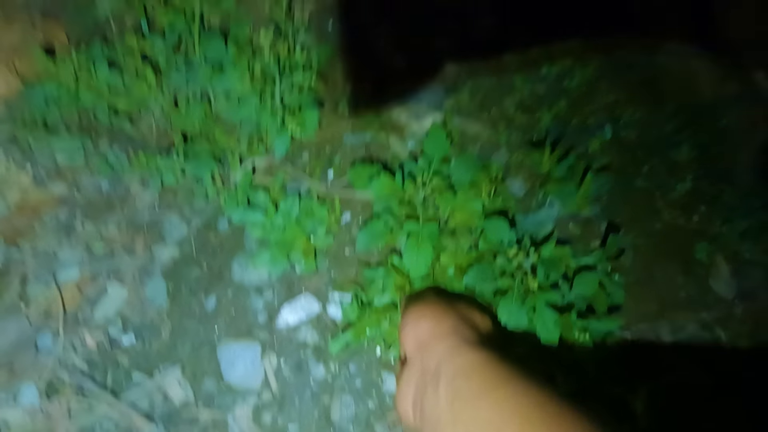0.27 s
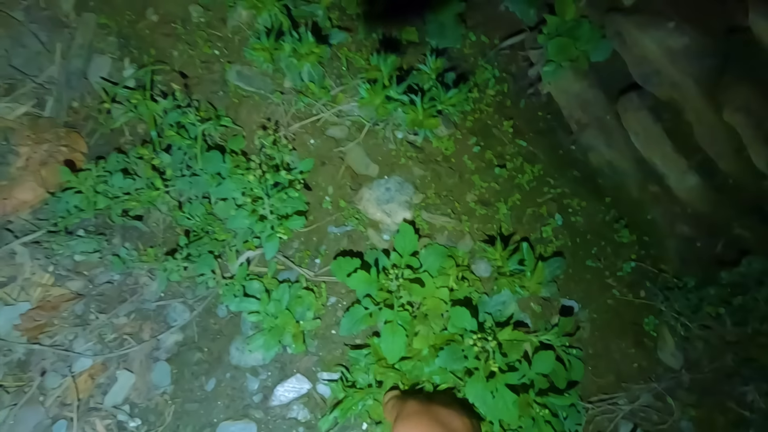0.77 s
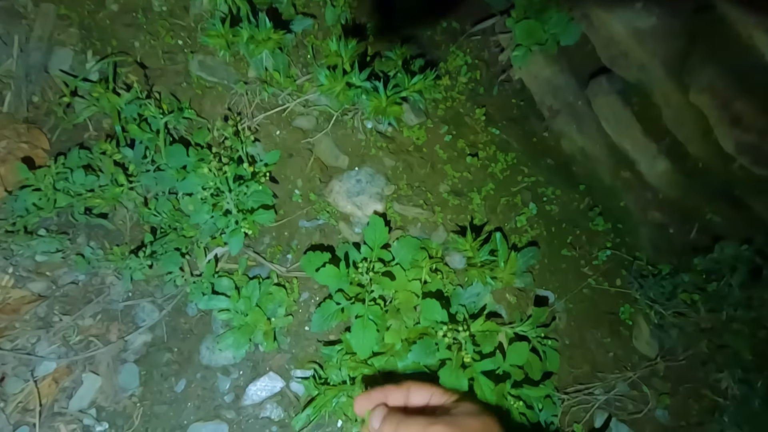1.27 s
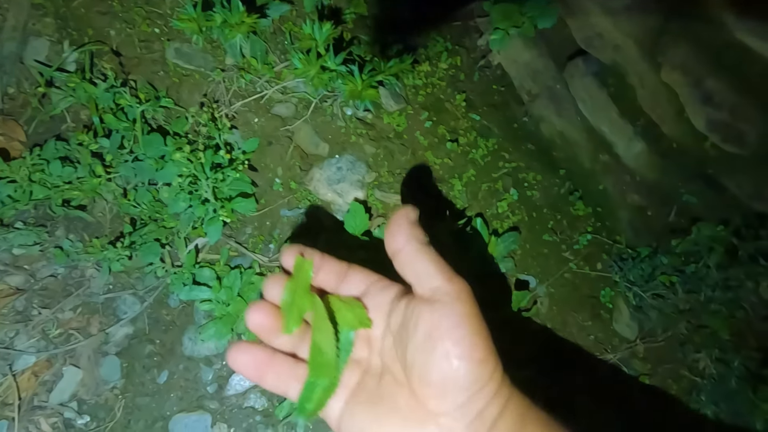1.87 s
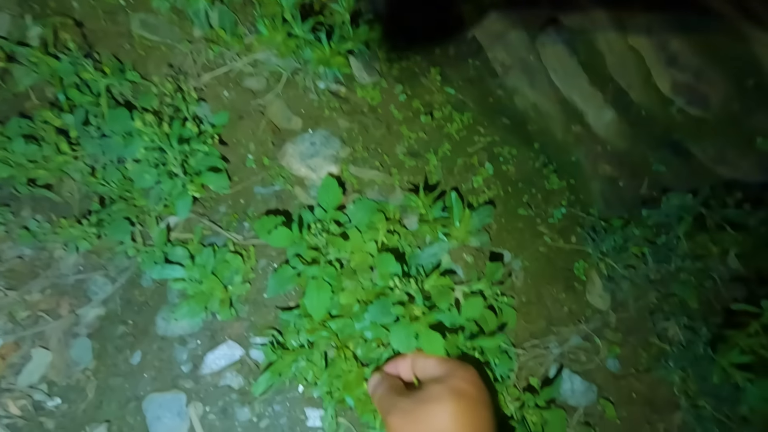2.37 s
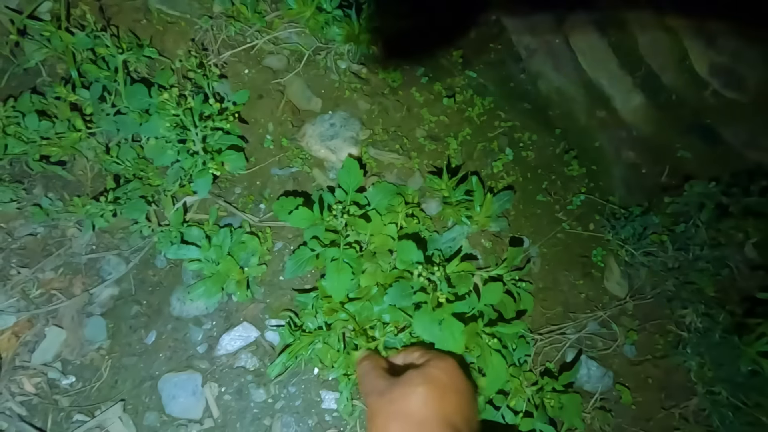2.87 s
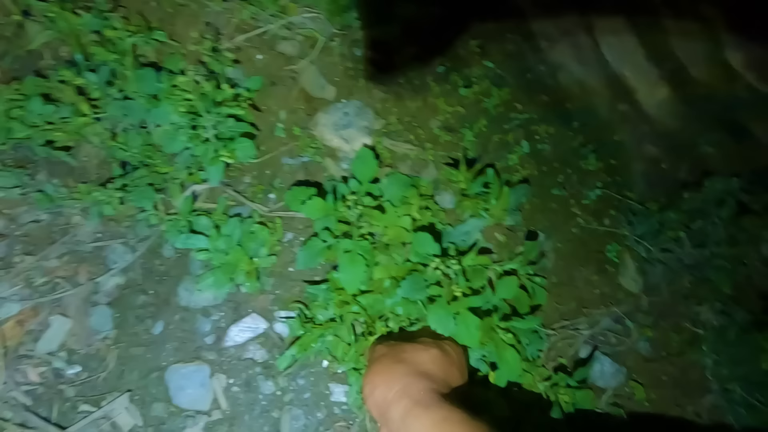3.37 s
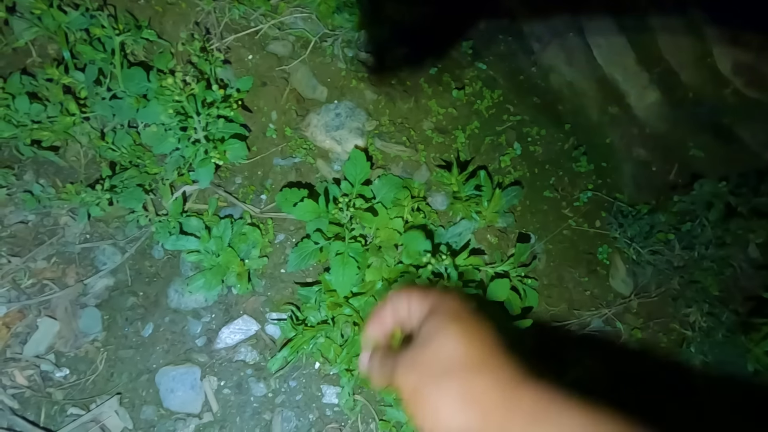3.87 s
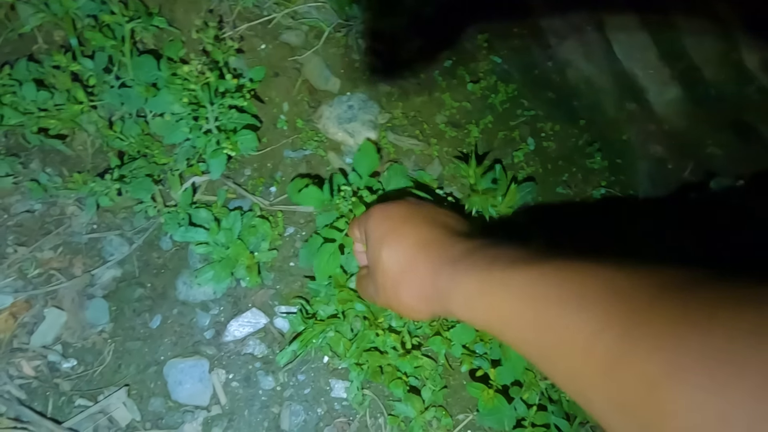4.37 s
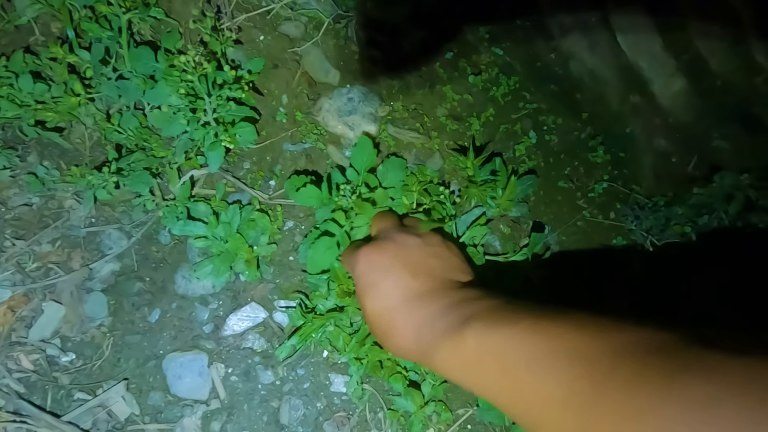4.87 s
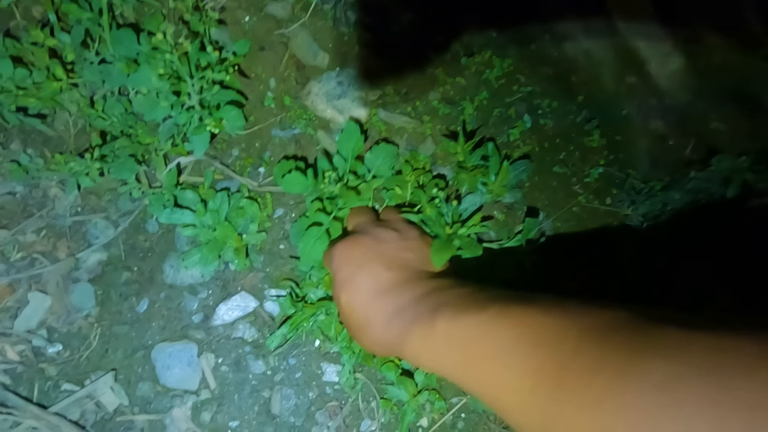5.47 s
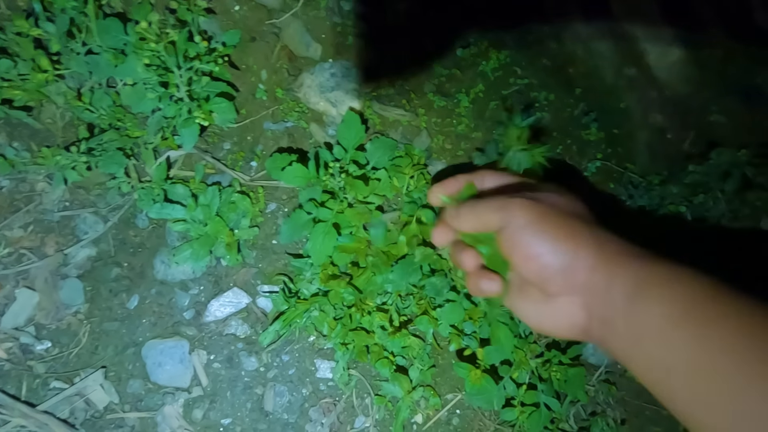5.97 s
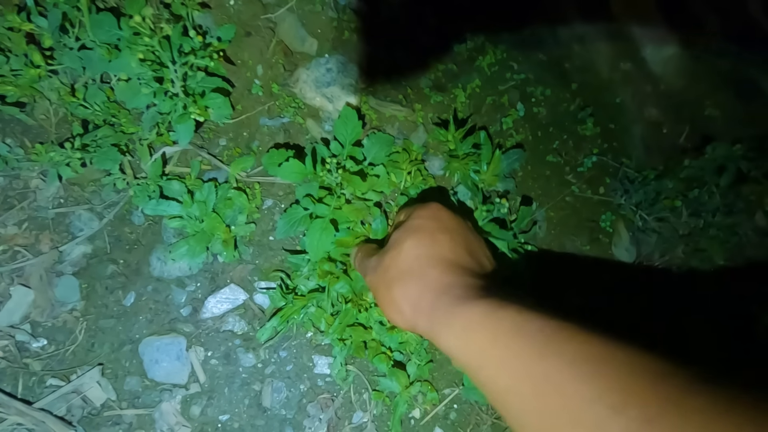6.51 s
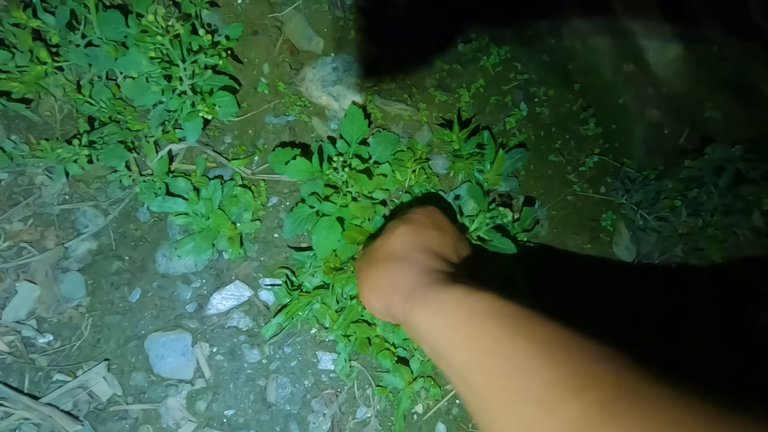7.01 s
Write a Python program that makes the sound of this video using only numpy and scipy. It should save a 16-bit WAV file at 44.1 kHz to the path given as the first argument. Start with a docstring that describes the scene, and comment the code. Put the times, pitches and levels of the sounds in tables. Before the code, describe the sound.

A dense chorus of field crickets chirps steadily at night while a hand rustles through leaves close by, with sharp little stem snaps and ticks.

```python
"""A night garden full of field crickets, with foliage rustling close by.
The crickets, a few near and many far, are falling 5 kHz sine syllables with faint octaves and echoes.
A hand picks leaves: shaped noise grains rustle, a thin noise band squeaks, and sharp clicks tick and snap.
The camera is bumped softly, as low taps and sways, and puffs of air rumble on its microphone."""
import sys
import numpy as np
from scipy import signal
from scipy.fft import rfft, irfft, next_fast_len
from scipy.io import wavfile
from scipy.ndimage import uniform_filter1d, map_coordinates

SR = 44100
rng = np.random.default_rng(int(sys.argv[2]) if len(sys.argv) > 2 else 0)


def store_wav(level_fs):
    """Save 16-bit WAV to argv[1]."""
    pcm = np.round(np.clip(np.atleast_2d(level_fs), -1, 1) * 32767)
    wavfile.write(sys.argv[1], SR, pcm.T.astype(np.int16))


N = 319725


def amp(db):
    """Decibels to gain."""
    return 10 ** (np.asarray(db) / 20)


def unit(x):
    """Scale to rms 1."""
    return x / np.sqrt(np.mean(x ** 2) + 1e-20)


def along(points, hz):
    """Read (f/Hz, level/dB) points on a log frequency axis, falling steeply beyond the ends."""
    f, level = np.transpose(points)
    knots = np.log([f[0] / 2, *f, f[-1] * 1.1])
    return np.interp(np.log(hz + 1), knots, [level[0] - 40, *level, level[-1] - 40])


def curves(rows):
    """One value per sample for each column after the time."""
    times, *columns = np.transpose(rows)
    return [np.interp(np.arange(N) / SR, times, column) for column in columns]


def wobble(rate):
    """A smooth random curve with rate knots a second."""
    knots = rng.standard_normal(int(N * rate / SR) + 4)
    return map_coordinates(knots, [np.arange(N) * rate / SR])


def colour(x, points):
    """Give x a spectrum."""
    size = next_fast_len(N + SR // 2)
    gain = amp(along(points, np.fft.rfftfreq(size, 1 / SR)))
    return irfft(rfft(x, size) * gain, size)[..., :N]


def impulse(points, size=1024):
    """The causal click that has this spectrum, peak 1."""
    gain = amp(along(points, np.fft.rfftfreq(size, 1 / SR)))
    # folding the cepstrum forward in time gives minimum phase: the energy comes at once
    cepstrum = irfft(np.log(gain))
    cepstrum[1:size // 2] *= 2
    cepstrum[size // 2 + 1:] = 0
    click = irfft(np.exp(rfft(cepstrum)))
    return click / np.abs(click).max()


def pan(db):
    """Left and right gains for a level difference; positive leans left."""
    return amp([[db / 2], [-db / 2]])


def spread(pair, side_db):
    """Two unrelated signals as the middle and the side of a stereo image."""
    mid, side = pair[0], amp(side_db) * pair[1]
    return np.array([mid + side, mid - side])


def add(track, s, sound):
    """Mix a sound into the track at time s."""
    start = round(s * SR)
    a, b = max(start, 0), min(start + sound.shape[-1], N)
    if b > a:
        track[..., a:b] += sound[..., a - start:b - start]


def scatter(x, t60, side_db):
    """Stereo echoes from stones, ground and plants: a decaying noise tail."""
    t = np.arange(SR // 3) / SR
    tail = spread(rng.standard_normal((2, len(t))), side_db) * amp(-60 * t / t60)
    tail /= np.linalg.norm(tail.mean(0))
    return signal.fftconvolve(x[None], tail, axes=1)[:, :N]


def patchy(x, depth_db):
    """Let the sound favour different frequencies from moment to moment, as each touched leaf does."""
    z = signal.stft(x, nperseg=256)[2]
    field = rng.standard_normal(z.shape[1:])
    field = uniform_filter1d(field, size=5, axis=0)  # across frequency
    field = uniform_filter1d(field, size=12, axis=1)  # across time
    return signal.istft(z * amp(depth_db * unit(field)), nperseg=256)[1][:, :N]


# spectrum shape of still air and distant insects: [f/Hz, relative level/dB]
NIGHT_SPECTRUM = [(25, 6.5), (55, -3.5), (100, -7.5), (170, 2.5), (330, -5.5), (600, -11.5), (1300, -15.5),
                  (2300, -28), (3500, -20), (6800, -8), (8300, -15.5), (10300, -12), (11500, -40),
                  (15000, -28)]


def night():
    """The quiet floor of the open air: wide noise with gently shifting patches."""
    noise = spread(rng.standard_normal((2, N)), side_db=-3.5)
    return amp(-69.0) * unit(colour(patchy(noise, depth_db=1.5), NIGHT_SPECTRUM))


# one wing stroke, slowing as it closes: [t/s from its loudest moment, pitch ratio, relative level/dB]
WING_STROKE = [(-.012, 1.045, -28), (-.005, 1.022, -6), (0, 1, 0), (.005, .968, -7), (.011, .925, -13),
               (.019, .875, -16), (.025, .85, -34)]


def add_syllable(track, s, db, hz, overtone_db=-35, uneven_db=2):
    """The scraper runs down the wing's file with uneven pressure: a falling tone with a faint octave."""
    when, ratio, level = np.transpose(WING_STROKE)
    below_peak = level < level.max()
    level = level + uneven_db * rng.standard_normal(len(level)) * below_peak
    t = np.arange(when[0], when[-1], 1 / SR)
    steepness = rng.uniform(0.86, 1.234)  # of the pitch fall
    pitch = hz * np.interp(t, when, ratio) ** steepness
    phase = 2 * np.pi * (np.cumsum(pitch) / SR + rng.random())
    tone = np.sin(phase) + amp(overtone_db) * np.sin(2 * phase)
    add(track, s + when[0], amp(db + np.interp(t, when, level)) * tone)


# spectrum shape of the merged farthest crickets: [f/Hz, relative level/dB per Hz]
HAZE_SPECTRUM = [(2000, -78), (3400, -54), (3460, -40), (4000, -15), (4090, -12.5), (4280, -9.5),
                 (4500, -0.5), (4940, -6), (5250, -23.5), (5490, -8.5), (5890, -27), (6300, -34),
                 (8190, -79), (13900, -120)]
# the far crickets together, before the chorus and haze trims: [t/s, level/dB]
FAR_CRICKET_LEVEL = [(0.0, -49.5), (0.8, -48.5), (1.15, -50), (1.32, -47.5), (1.97, -50.5), (2.75, -48.5),
                     (3.9, -49), (4.45, -51), (4.85, -49), (5.42, -50), (6.1, -49), (7.1, -51)]


def far_crickets(count=9, pitch_hz=5020, stroke_gap=.051, chirp_gap=.29):
    """Each cricket repeats four-syllable chirps at its own pitch and pace, from its own place."""
    chorus = np.zeros((2, N))
    for rank in np.linspace(-1, 1, count):
        song = np.zeros(N)
        hz = pitch_hz * (1 + 0.0544 * rank)
        pace = chirp_gap * rng.uniform(.85, 1.25)
        for start in np.arange(-rng.random() * pace, N / SR, pace):
            start += rng.normal(0, .015)
            for k in range(4):
                db = rng.normal(0, 2.5) - 3 * abs(rank)
                add_syllable(song, start + k * stroke_gap, db, hz * (1 + rng.normal(0, 0.0075)))
        # a sound from one side reaches one microphone a moment later
        direct = np.array([song, np.roll(song, rng.integers(-1, 2))])
        chorus += direct + amp(-3.0) * scatter(song, t60=0.22, side_db=-3.5)
    # the farthest ones merge into a narrow hiss
    haze = unit(colour(spread(rng.standard_normal((2, N)), side_db=-4.5), HAZE_SPECTRUM))
    haze_db = -4 + 1.44 * wobble(11)
    level_db, = curves(FAR_CRICKET_LEVEL)
    return amp(level_db) * (amp(-2.5) * unit(chorus) + amp(haze_db) * haze) * pan(2.7)


def chirping(rows, gap_s, soft_db, flat, count=4):
    """Chirps of a few wing strokes that start soft and flat, and reach full level and pitch at the end."""
    song = np.zeros(N)
    for s, db, hz in rows:
        for k in range(count):  # counted back from the last stroke
            slack = (k / (count - 1)) ** 2
            stroke_db = db - soft_db * slack + rng.normal(0, 0.46)
            add_syllable(song, s - k * gap_s, stroke_db, hz * (1 - flat * slack))
    return song


# the neighbours' free chirps, before pan and echo: [t/s of the last stroke, level/dB, f/Hz]
NEIGHBOUR_CHIRPS = [(0.282, -39, 5040), (0.715, -41, 5070), (0.89, -43, 5230), (1.095, -37, 5025),
                    (1.374, -39.5, 5170), (1.825, -35.5, 5150), (1.946, -36.5, 4986), (2.295, -39, 4980),
                    (2.776, -36, 5065), (3.243, -40.5, 5120), (3.747, -39, 5175), (4.027, -38.5, 5060),
                    (4.192, -37.5, 4995), (4.434, -41, 5060), (4.625, -39, 5130), (4.856, -40.5, 5080),
                    (5.077, -37, 5140), (5.302, -38, 5080), (5.566, -35.5, 5180), (6.049, -41.5, 5120),
                    (6.514, -40.5, 5240), (6.91, -37.5, 4900), (6.974, -37.5, 5190)]


def neighbours():
    """A little farther off than the nearest, crickets with faster strokes and more echo."""
    song = chirping(NEIGHBOUR_CHIRPS, gap_s=0.035, soft_db=15, flat=0.0194)
    return song * pan(2.3) + amp(-5) * scatter(song, t60=0.078, side_db=-4.5)


# runs of evenly timed chirps, by their last strokes: [first chirp t/s, last chirp t/s]
LEAD_CHIRP_RUNS = [(0.2, 0.522), (0.793, 3.977), (4.45, 4.716), (5.361, 7.229)]
# the nearest cricket's loudness, before pan and echo: [t/s, level/dB]
LEAD_CRICKET_LEVEL = [(0.4, -37), (1.05, -34), (2.0, -36.5), (2.8, -38), (3.7, -35), (3.97, -39),
                      (4.45, -53), (5.35, -37), (6.2, -40.5), (7.2, -38)]


def lead_cricket(pitch_hz=5025, period_s=.265):
    """The nearest cricket chirps on the left, evenly within each run, with a short echo."""
    runs = []
    for first, last in LEAD_CHIRP_RUNS:
        # a whole number of chirps fills the run, so the period is approximate
        runs.append(np.linspace(first, last, round((last - first) / period_s) + 1))
    times = np.concatenate(runs)
    levels = np.interp(times, *np.transpose(LEAD_CRICKET_LEVEL))
    rows = [(s, db, pitch_hz) for s, db in zip(times, levels)]
    song = chirping(rows, gap_s=.0485, soft_db=11.5, flat=0.0571)
    return song * pan(7.6) + amp(-6.5) * scatter(song, t60=0.16, side_db=-9)


# soft bumps on the camera, before pan: [t/s, tap level/dB, sway level/dB]
CAMERA_BUMPS = [(0.571, -44.5, -43), (1.094, -54, -71), (1.279, -54.5, -85)]
# bell-shaped swells of air on the microphone, before pan: [t/s of the middle, sigma/s, level/dB]
AIR_PUFFS = [(0.62, 0.031, -54), (.98, 0.03, -72), (1.918, 0.048, -52.5), (3.172, 0.091, -72),
             (7.14, .025, -60.5)]


def handling(sway_hz=62, sway_t60=0.31):
    """Bumps tap and sway the camera; puffs of air rumble on its microphone."""
    bumps, t = np.zeros(N), np.arange(SR // 4) / SR
    tap = impulse([(60, -29), (180, 5), (360, 14), (600, -15), (1500, -13)])
    # the grip yields, so the sway slows from sway_hz as it dies
    sway = amp(-60 * t / sway_t60) * np.sin(2 * np.pi * sway_hz * t / (1 + 5 * t))
    for s, tap_db, sway_db in CAMERA_BUMPS:
        add(bumps, s, amp(tap_db) * tap)
        add(bumps, s, amp(sway_db) * sway)
    air = np.zeros(N)
    for s, width, db in AIR_PUFFS:
        air += amp(db) * np.exp(-.5 * ((np.arange(N) / SR - s) / width) ** 2)
    noise = spread(rng.standard_normal((2, N)), side_db=-9.0)
    rumble = unit(colour(noise, [(20, 15.0), (40, 3.0), (90, -7.5), (200, -21.5)]))
    return (bumps + air * rumble) * pan(6.0)


def squeak(pitch_hz=1330, db=-68, start_s=1.42, length_s=.11):
    """A leaf squeaks faintly as it slides over the skin: a thin noise band that swells and fades."""
    band = [(pitch_hz * .9, -25), (pitch_hz * .98, 0), (pitch_hz * 1.02, 0), (pitch_hz * 1.1, -25)]
    tone = unit(colour(rng.standard_normal(N), band))
    progress = np.clip((np.arange(N) / SR - start_s) / length_s, 0, 1)
    return amp(db) * np.sin(np.pi * progress) * tone


def grains(rate, size_db):
    """Two trains of tiny slips, rate a second, mostly small and a few large."""
    hits = rng.random((2, N)) < rate / SR
    strength = hits * rng.standard_normal((2, N))
    return unit(strength * amp(size_db * np.minimum(rng.exponential(size=(2, N)), 4)))


# spectrum shape of crisp leaf edges: [f/Hz, relative level/dB per Hz]
EDGE_SPECTRUM = [(2000, -19), (3500, -8), (5000, -8), (6000, -5.5), (7200, 1.5), (7800, -5.5),
                 (8500, -14.5), (10200, -15.5), (11500, -25), (14500, -28.5)]
# spectrum shape of leaf faces rubbing: [f/Hz, relative level/dB per Hz]
FACE_SPECTRUM = [(150, -52), (330, 4.5), (700, -18), (1100, 1), (1450, 4.5), (1900, 1), (2600, 3),
                 (3600, -3), (5000, -1), (8000, -39)]
# the hand stirring in the plants, before unevenness and trims: [t/s, edges level/dB, faces level/dB]
HAND_STIR = [(0.0, -61.5, -74), (0.55, -69, -71.5), (1.05, -65.5, -73.5), (1.23, -65.5, -63.5),
             (1.58, -63, -71.5), (1.7, -76, -79), (2.05, -89, -78.5), (2.2, -60.5, -72), (2.6, -68, -73.5),
             (3.13, -62.5, -68), (3.5, -68.5, -80), (4.05, -67, -72.5), (4.2, -58, -58.5),
             (4.65, -61.5, -65.5), (5.3, -57.5, -63.5), (5.58, -59.5, -70.5), (6.1, -60, -65),
             (7.1, -63, -71)]
# a leaf dragged through the fingers or springing back, before trims:
# [start t/s, length/s before the release, edges level/dB, faces level/dB]
LEAF_BRUSHES = [(0.011, 0.088, -60.5, -78), (0.797, 0.071, -59.5, -67), (1.527, 0.082, -59, -83),
                (2.131, 0.028, -55.5, -83), (2.28, .06, -62, -72), (2.675, 0.046, -63, -71.5),
                (2.838, 0.053, -58.5, -61), (3.772, .07, -55, -58), (3.929, 0.024, -59, -76),
                (4.13, 0.15, -55.5, -64), (4.335, 0.049, -55, -60.5), (4.53, 0.19, -58, -64.5),
                (5.421, 0.023, -63, -72), (5.68, 0.16, -57.5, -58.5), (5.847, 0.092, -52.5, -56.5),
                (6.13, 0.031, -81, -57.5), (6.298, 0.042, -53, -69), (6.443, 0.092, -58.5, -60.5),
                (6.854, 0.052, -57.5, -73), (7.197, .05, -60, -68)]
BRUSH_ATTACK_S, BRUSH_RELEASE_S = 0.015, 0.029


def leaves(flick_db=-6.0):
    """Leaf edges crackle in clumps, with stray flicks, while their faces rub with a softer hush."""
    uneven_db = 2.23 * wobble(14) - 1.3  # fingers catch and let go
    # stirring and brushes add as powers
    edges, faces = amp(np.array(curves(HAND_STIR)) + uneven_db) ** 2
    t = np.arange(N) / SR
    for s, length, edges_db, faces_db in LEAF_BRUSHES:
        attack = np.clip((t - s) / BRUSH_ATTACK_S, 0, 1)
        swell = attack * np.exp(-np.maximum(t - s - length, 0) / BRUSH_RELEASE_S)
        edges += (amp(edges_db) * swell) ** 2
        faces += (amp(faces_db) * swell) ** 2
    clumps = amp(1.26 * wobble(90) + 1.38 * wobble(25))
    crackle = spread(grains(rate=4000, size_db=1.0), side_db=-29) * clumps
    crisp = unit(colour(patchy(crackle, depth_db=2.5), EDGE_SPECTRUM))
    stray = spread(grains(rate=45, size_db=2.5), side_db=-22)
    flicks = unit(colour(patchy(stray, depth_db=3), EDGE_SPECTRUM))
    hush = spread(grains(rate=4000, size_db=1.6), side_db=-3) * clumps
    rub = unit(colour(patchy(hush, depth_db=2.0), FACE_SPECTRUM))
    edge_sound = np.sqrt(edges) * (amp(-0.5) * crisp + amp(flick_db) * flicks)
    return edge_sound * pan(0.45) + np.sqrt(faces) * rub * pan(0.28)


def crack(click, t60, fibres):
    """One sharp break and a spray of tearing fibres, each sounding the same click; peak 1."""
    t = np.arange(SR // 50) / SR
    force = fibres * rng.standard_normal(len(t)) * amp(-60 * t / t60)
    force[0] = 1
    sound = signal.fftconvolve(force, click)
    return sound / np.abs(sound).max()


# a green stalk's broad resonance: [multiple of its pitch, relative level/dB]
STALK_RESONANCE = [(.3, -23.5), (.65, -5.5), (1, 3.5), (1.3, -3.5), (1.8, -24.5), (3, -60)]


def stalk(hz):
    """The heavily damped pop of a green stalk."""
    return impulse([(hz * ratio, db) for ratio, db in STALK_RESONANCE])


# ringing modes of the jolt in the hand, before small random shifts: [f/Hz, relative level/dB, t60/s]
KNOCK_MODES = [(266, -9, 0.085), (348, -4, 0.029), (445, -11, 0.057), (666, 1, .026), (855, 1.5, 0.015),
               (1042, -7.5, 0.026)]


def knock():
    """The short hollow ring of a jolt in the hand: a few decaying sines."""
    t = np.arange(SR // 10) / SR
    ring = np.zeros(len(t))
    for hz, db, t60 in KNOCK_MODES:
        strength_db, detune = rng.normal(0, 1.5), rng.normal(0, .008)
        ring += amp(db + strength_db - 60 * t / t60) * np.sin(2 * np.pi * hz * (1 + detune) * t)
    return ring


# stems breaking, levels before filter, pan and the knock's trim:
# [t/s, crack level/dB, stalk pop level/dB, pop f/Hz, knock level/dB]
STEM_SNAPS = [(0.7146, -21, -27.5, 2170, -52), (0.784, -17, -27.5, 2270, -29.5),
              (0.8216, -25, -32.5, 2060, -36), (3.711, -20.5, -40, 970, -26),
              (5.678, -9.5, -26, 3900, -25.5), (7.1906, -14, -18, 3250, -32.5),
              (7.194, -18, -30.5, 1140, -39)]
# spectrum shape of a stem's crack: [f/Hz, relative level/dB per Hz]
CRACK_SPECTRUM = [(600, -63), (1500, -25), (2500, -6.5), (3500, -3), (4500, 4), (5500, -0.5), (7000, 6),
                  (8200, -11.5), (10000, -10.5), (12000, -25.5), (15000, -31)]
# the loudest flicks of one leaf past another, before trims: [t/s, level/dB, f/Hz]
LEAF_TICKS = [(0.085, -41.5, 7000), (0.131, -40.5, 4620), (0.724, -33.5, 5750), (1.326, -44, 6860),
              (1.485, -43, 7100), (1.559, -35, 6550), (1.585, -42, 7200), (2.157, -38, 7400),
              (2.306, -35.5, 3360), (2.922, -38, 3200), (3.118, -43, 7160), (3.133, -38.5, 6800),
              (3.171, -34.5, 5860), (3.79, -42, 1830), (3.81, -36, 6840), (3.85, -40, 1960),
              (4.346, -38, 7200), (4.716, -35.5, 6700), (5.463, -36.5, 6860), (5.911, -36, 6960),
              (6.406, -38, 7400), (7.134, -42, 6950)]


def picking(low_cut_hz=195):
    """Stems crack, pop and jolt the hand; freed leaves tick."""
    out = np.zeros(N)
    for s, crack_db, pop_db, hz, knock_db in STEM_SNAPS:
        add(out, s, amp(crack_db) * crack(impulse(CRACK_SPECTRUM), t60=0.0096, fibres=0.16))
        add(out, s, amp(pop_db) * crack(stalk(hz), t60=0.0068, fibres=0.2))
        add(out, s, amp(knock_db - 10) * knock())
    for s, db, hz in LEAF_TICKS:
        add(out, s, amp(db - 4.0) * crack(impulse(EDGE_SPECTRUM), t60=0.013, fibres=0.59))
        add(out, s, amp(db - 3.0) * crack(stalk(hz), t60=0.0096, fibres=0.43))
    # keep the snaps and ticks thin, with little below low_cut_hz
    out = signal.sosfilt(signal.butter(4, low_cut_hz, "high", fs=SR, output="sos"), out)
    return out * pan(1.2) + amp(-15.0) * scatter(out, t60=0.096, side_db=2.5)


def scene():
    """Crickets all round, the hand in front."""
    crickets = lead_cricket() + neighbours() + far_crickets()
    hand = leaves() + squeak() + picking()
    return crickets + hand + handling() + night()


def record(dry, lag_s=1.3e-5, top_hz=15600):
    """The right microphone is duller in the treble and hears a trace later; nothing passes top_hz."""
    right = colour(dry[1], [(10, 0), (6800, 0), (8200, -5.5), (10500, -6.5), (15000, -4)])
    left = colour(dry[0], [(10, 0), (6800, 0), (8200, 2), (10500, 2.5), (15000, 2)])
    hz = np.fft.rfftfreq(N, 1 / SR)
    delay = np.exp(-2j * np.pi * hz * np.array([[0], [lag_s]]))
    return irfft(rfft(np.array([left, right])) * delay * (hz < top_hz), N)


dry = scene()
out = record(dry)
store_wav(out)
```